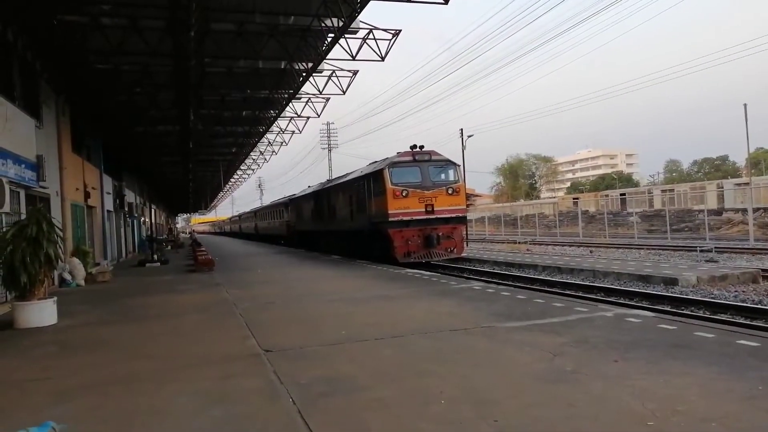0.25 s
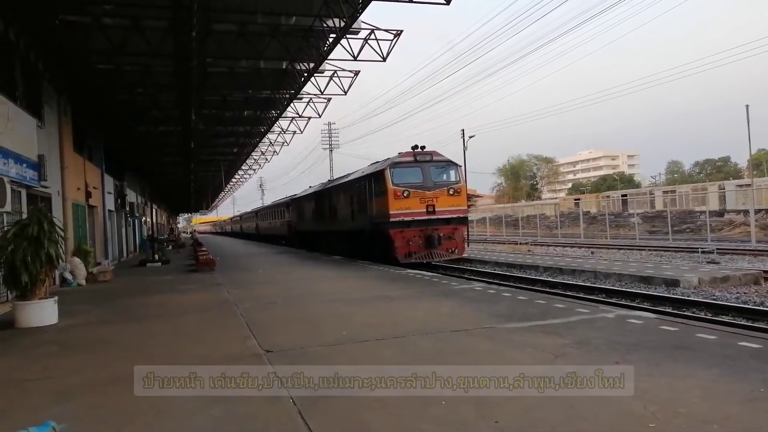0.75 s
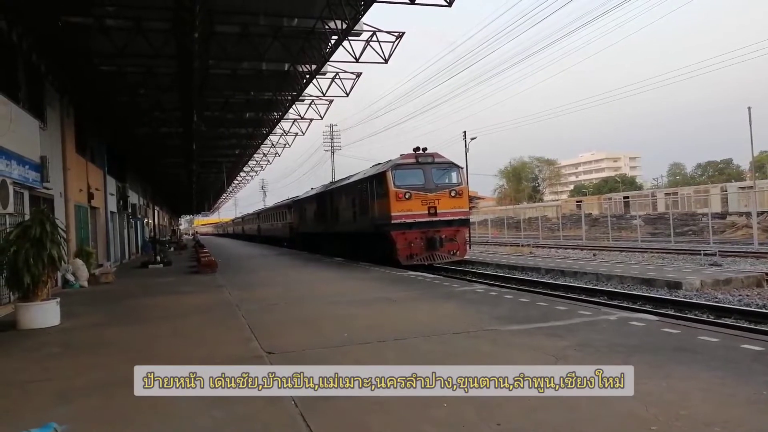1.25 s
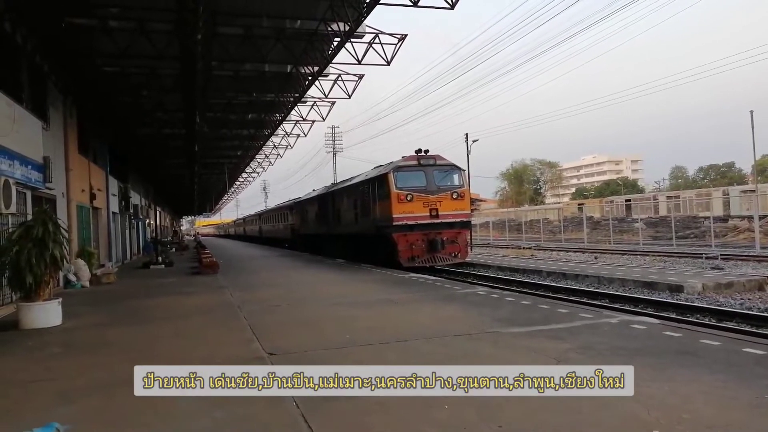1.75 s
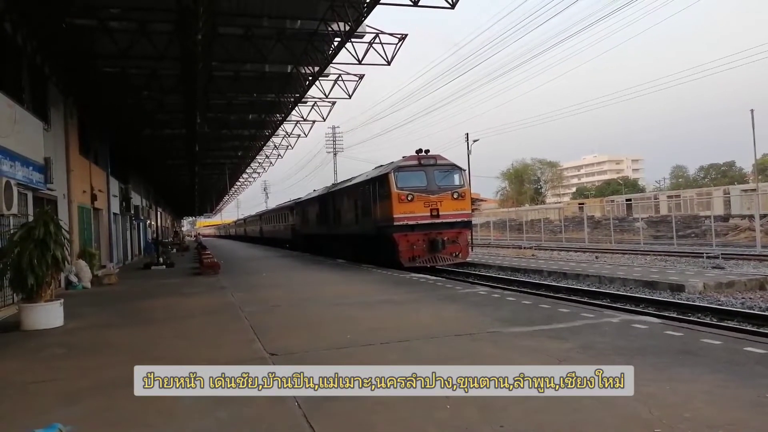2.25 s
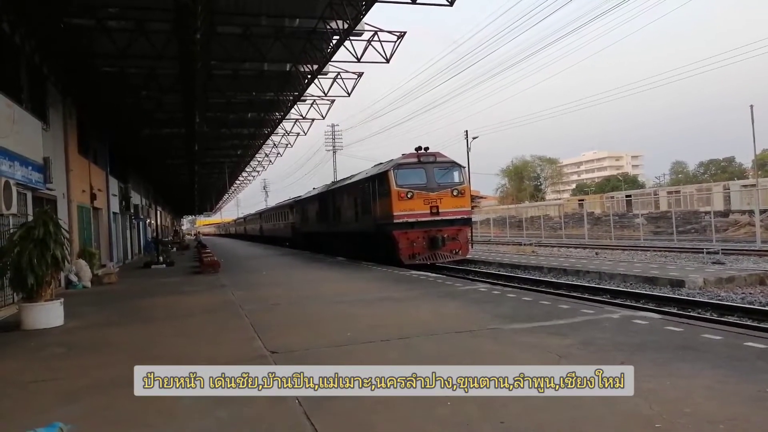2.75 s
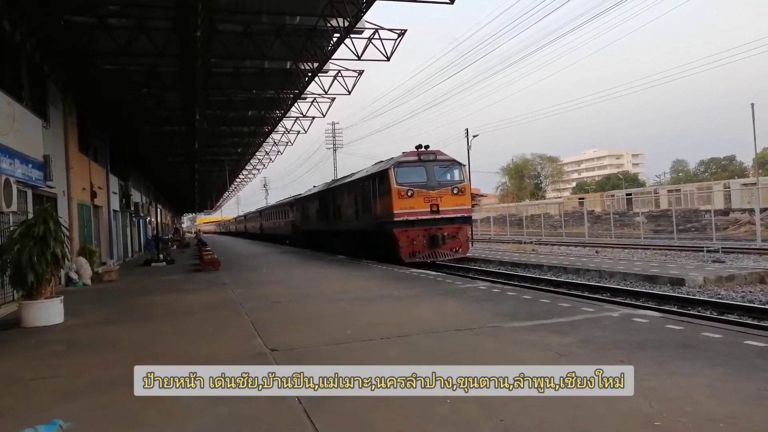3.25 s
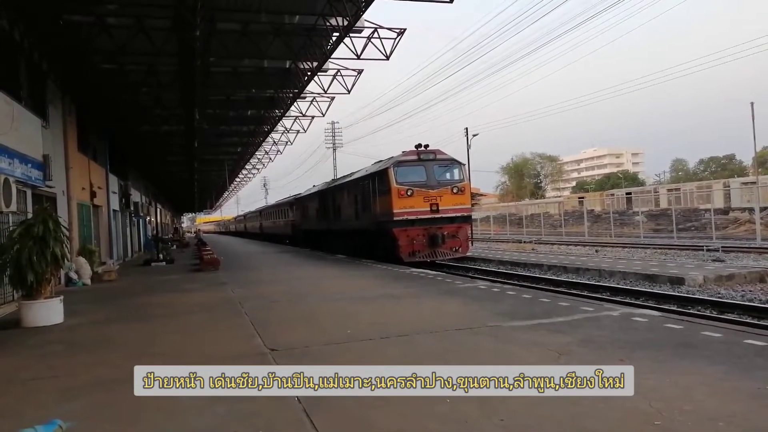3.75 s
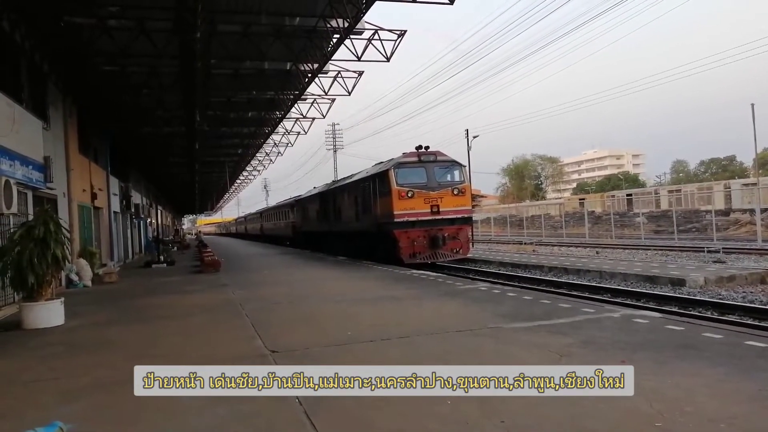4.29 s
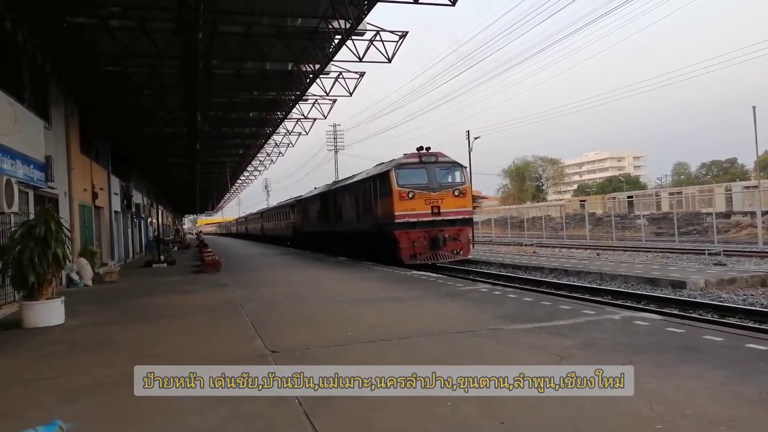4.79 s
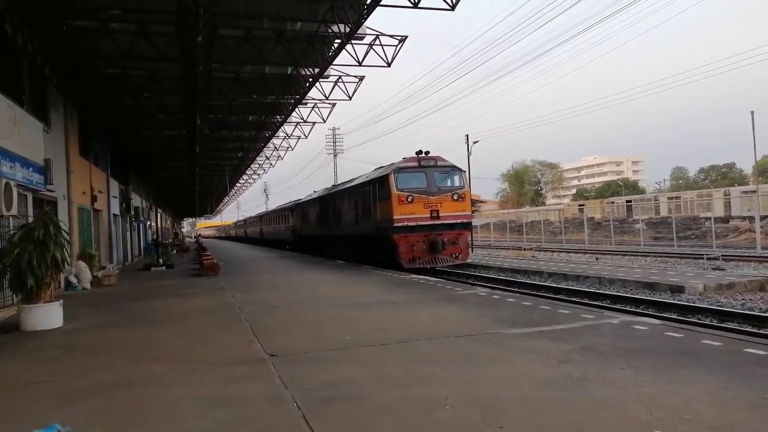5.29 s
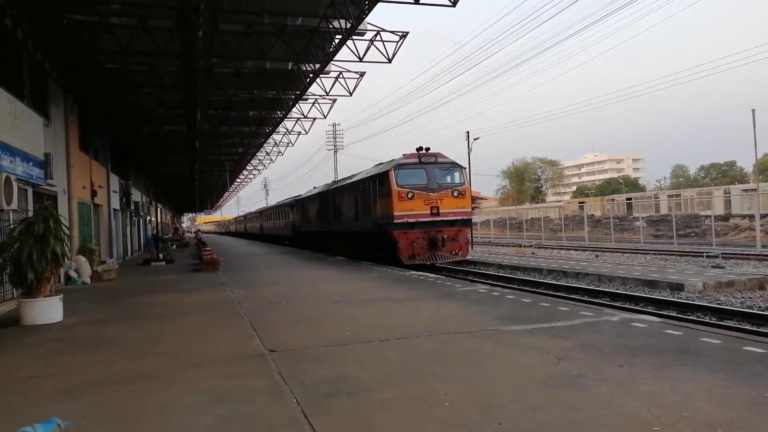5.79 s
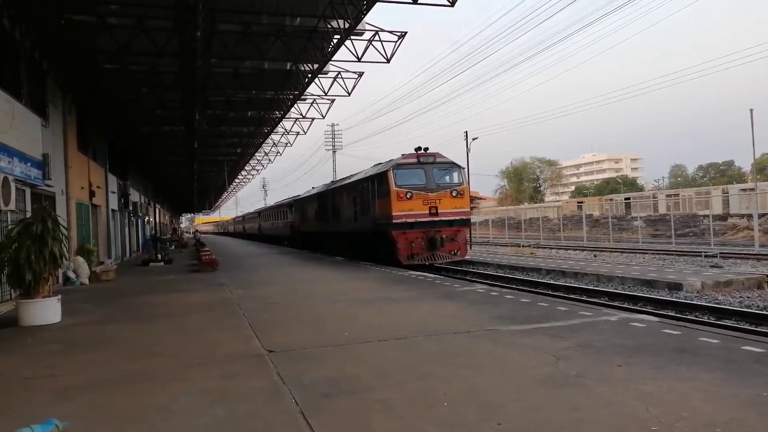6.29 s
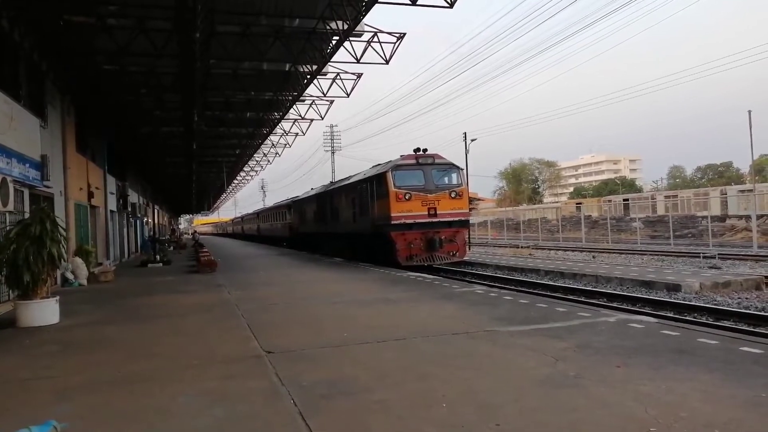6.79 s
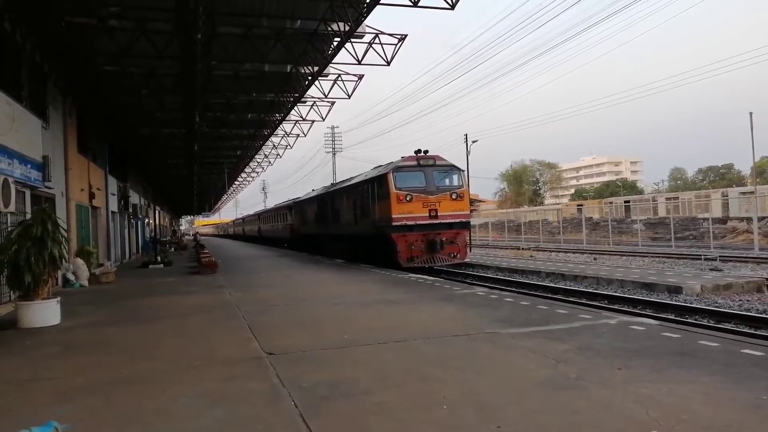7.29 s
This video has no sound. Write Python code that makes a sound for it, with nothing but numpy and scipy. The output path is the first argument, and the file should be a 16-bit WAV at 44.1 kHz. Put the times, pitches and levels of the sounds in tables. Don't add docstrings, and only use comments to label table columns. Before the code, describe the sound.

A blaring train horn wavers twice and cuts off with an echo, then a diesel locomotive idles, hisses air and revs up with a whine.

```python
import sys
import numpy as np
from scipy import signal
from scipy.fft import rfft, irfft, next_fast_len
from scipy.io import wavfile
from scipy.ndimage import uniform_filter1d, minimum_filter1d, map_coordinates

SR = 44100
rng = np.random.default_rng(int(sys.argv[2]) if len(sys.argv) > 2 else 0)


def amplitude_ratio(level_db):
    exponent = np.asarray(level_db, float) / 20
    return 10 ** exponent


def pcm_store(signal):
    levels = np.round(np.clip(np.atleast_2d(signal), -1, 1) * 32767)
    wavfile.write(sys.argv[1], SR, levels.astype(np.int16).T)


N = 332514

# delay_s, level_db, dull_above_hz
ECHOES = [(.017, -37, 12300), (.033, -34, 3770), (.056, -18, 8800), (.1005, -5, 1360), (.19, -24, 2500),
          (.42, -27, 2930), (.6, -37, 2480), (.85, -62, 1250), (1.45, -43.5, 800)]
# delay_s, level_db
GLINTS = [(.0019, -14), (.0037, 4.5), (.0071, -4)]
# band_hz, t60_s, level_db
STATION_T60 = [(367, 2.83, -1), (800, 2.53, -2), (1640, 1.2, 6.5), (3400, 0.8, 11.5), (6000, 0.88, 11.5)]
GLINT_ABOVE_HZ = 10800

EXHAUST_IDLE_DB = [-47.7, -51.3, -55.3, -40.2, -51.7, -47.9, -39.9, -36.2, -34.1, -38.8, -42.9, -26.3,
                   -36.9, -36.3, -42.2, -37.8, -34.7, -47.1, -43.4, -38.5, -37.8, -46.7, -40.1, -37.6,
                   -46.5, -45.6, -50.5, -35.8, -48.2, -44.8, -53.1, -46.7, -45.0, -50.1, -45.1, -43.9,
                   -49.7, -46.1, -46.3, -50.3, -51.1, -51.9, -49.4, -43.5]
# multiple, added_db
EXHAUST_LOADED = [(5, 11), (11, 10), (14, 7), (16, 7.5), (19, 3), (22, 9), (30, -2), (48, 7)]
# time_s, load_0_to_1
LOAD = [
    (1.6, .3),
    (5.2, 0.13),
    (6.3, 0.27),
    (6.45, .7),
    (6.65, 0.26),
    (6.92, 1.1),
    (7.1, 0.9),
    (7.54, 0.8),
]
# freq_hz, density_db
RUMBLE = [(22, -11.5), (45, -13.5), (80, 3), (130, -4), (250, -5), (400, -5), (520, -28), (800, -10)]
# freq_hz, density_db
CLATTER = [(350, -4.5), (520, -4.5), (800, -0.5), (1300, -5), (1900, 0.5), (2500, -3.5), (3000, -13.5),
           (4400, -16.5), (5300, -23.5), (9000, -26.5), (10200, -36), (14800, -55)]
# freq_hz, rms_db
FAN_LINES = [(405.8, -49.5), (709, -46.5), (988, -61), (1366, -50.5), (1703, -47.5)]
IDLE_CYCLES_PER_S, REV_FROM_S, REV_CYCLES_PER_S2 = 5.875, 6.45, .61
FIRINGS_PER_CYCLE, CYCLE_START_RAD, PIPE_SMEAR_RAD = 16, 2.2, 1.6
RUMBLE_DB, RUMBLE_LOAD_DB, CLATTER_DB, CLATTER_LOAD_DB = -28, 1.5, -29.5, 3.5
COARSE_SAMPLES = 12

# start_s, attack_s, hold_s, release_db_per_s, level_db
BURSTS = [
    (2.097, .03, .04, 98, -29.5),
    (5.922, 0.0068, .03, 68, -33.5),
]
# freq_hz, density_db
BURST_COLOUR = [(1760, -38), (3000, -1), (4190, 4.5), (4540, 0.5), (5890, -9.5), (6960, 1.5), (8330, 2),
                (11100, -12.5), (12900, -16), (14800, -36)]
# start_s, attack_s, hold_s, release_db_per_s, level_db
LEAKS = [
    (5.12, 0.22, .55, 10, -42),
    (6.4, .03, .02, 74, -53),
    (6.8, 0.043, .06, 70, -50),
]
# freq_hz, density_db
LEAK_COLOUR = [(2500, -24), (3500, -2), (5000, -2.5), (7500, -2.5), (9500, -5.5), (11000, -19.5),
               (14800, -32)]
# start_s, end_s, freq_hz, width_hz, level_db
WHISTLES = [
    (2.12, 2.3, 4530, 50, -46),
    (2.115, 2.2, 3600, 300, -46),
    (5.22, 5.58, 8000, 40, -51),
    (5.4, 5.9, 5570, 40, -58),
    (5.25, 5.6, 12000, 3000, -59),
    (5.0, 7.1, 1130, 90, -42),
    (5.925, 5.96, 3450, 250, -37),
    (5.926, 5.95, 11300, 800, -48),
    (5.3, 5.55, 9500, 200, -54),
    (5.92, 6.1, 9800, 3000, -49),
]

WHINE_FROM_S, WHINE_SETTLE_S, WHINE_START_HZ, WHINE_END_HZ = 6.94, 0.23, 7600, 7080
WHINE_DB, WHINE_RISE_DB = -32.5, 22

# time_s, pitch_hz, level_db
HORN = [
    (0, 620.2, 20),
    (.505, 619.8, 24.5),
    (.635, 596.5, 17.5),
    (.7, 615, 18),
    (.87, 621.2, 21.5),
    (1.05, 588, 16),
    (1.112, 586, 8.5),
    (1.125, 566, 9.5),
    (1.16, 555, 9.5),
]
HORN_ORDERS_DB = [-11.9, -26.8, -14.1, -14.8, -27.1, -23.7, -14.4, -30.2, -40.2, -44.1, -38, -39, -49, -46,
                  -45.0, -50.8, -53, -61, -62.4, -60, -75, -72, -61.0, -70, -70]
# multiple, change_db per tenth of pitch sag
SAG = [(1, -14.5), (2, 17.5), (3, 0), (5, 10.5), (7, -27.5), (10, -8), (18, 3), (25, 18)]
# freq_hz, density_db
HORN_AIR = [(400, -7), (900, -9), (2000, 1.5), (4000, -6.5), (7500, -7), (9500, -18), (11000, -19),
            (14500, -33)]
HORN_STOP_S, HORN_RELEASE_DB_PER_S = 1.1485, 1295
RUN_IN_SAMPLES = SR
SPREAD_RAD = .49

# freq_hz, level_db
RECORDER_LINE = (12896, -84)
# depth_db under the whole sound, spread_db
MUTE = (-69, 5)
DUCK_DB, RECOVER_FROM_S, RECOVER_S = -20, 1.08, 0.21
CEILING = .94


def in_time(rows, lead=0):
    s, *columns = np.transpose(rows)
    return [np.interp(np.arange(-lead, N) / SR, s, c) for c in columns]


def rms_one(x):
    return x / np.sqrt(np.mean(x ** 2) + 1e-20)


def drift(rate, size=N):
    r = np.exp(-80 * np.pi * rate / SR)
    slow = signal.lfilter([1], [1, -2 * r, r * r], rng.standard_normal(size // 40 + 2002))[2000:]
    return np.interp(np.arange(size) / 40, np.arange(len(slow)), rms_one(slow))


def wander(rate, count):
    knots = rng.standard_normal((count, int(8 * 6) + 4))
    at = np.arange(N // COARSE_SAMPLES + 1) * COARSE_SAMPLES / SR * np.clip(rate, .1, 6)
    return [map_coordinates(row, [at], order=3) for row in knots]


def coloured(spectrum, size=N):
    pad = next_fast_len(size)
    hz, db = np.transpose(spectrum)
    grid_hz = np.fft.rfftfreq(pad, 1 / SR) + 1
    shape = amplitude_ratio(np.interp(np.log(grid_hz), np.log(hz), db, left=-90, right=-90))
    return rms_one(irfft(rfft(rng.standard_normal(pad)) * shape, pad)[:size])


def narrow_noise(hz, width_hz):
    phase = 2 * np.pi * np.cumsum(hz + np.zeros(N)) / SR
    low_pass = signal.butter(2, width_hz / 2, fs=SR, output="sos")
    a, b = signal.sosfilt(low_pass, rng.standard_normal((2, N)))
    return rms_one(a * np.cos(phase) + b * np.sin(phase))


def puffs(rows):
    t = np.arange(N) / SR
    total = np.zeros(N)
    for start, attack, hold, fall_db, db in rows:
        release_db = fall_db * np.maximum(t - start - attack - hold, 0)
        total += amplitude_ratio(db - release_db) * np.clip((t - start) / attack, 0, 1) ** 2
    return total


def station(wet_db):
    pad = SR * 5
    t, grid_hz = np.arange(SR * 2) / SR, np.fft.rfftfreq(pad, 1 / SR)
    white, tail = rng.standard_normal(len(t)), 0
    for hz, t60, db in STATION_T60:
        octave = signal.butter(2, [hz / np.sqrt(2), hz * np.sqrt(2)], "band", fs=SR, output="sos")
        tail = tail + signal.sosfilt(octave, white) * amplitude_ratio(db - 60 * t / t60) * np.clip(t / 0.011, 0, 1)
    paths = 1 + amplitude_ratio(wet_db) * rfft(tail, pad)
    for delay, db, cut_hz in ECHOES:
        paths += amplitude_ratio(db) * np.exp(-2j * np.pi * grid_hz * delay) / (1 + 1j * grid_hz / cut_hz) ** 2
    for delay, db in GLINTS:
        treble = 1 / (1 - 1j * GLINT_ABOVE_HZ / (grid_hz + 1)) ** 2
        paths += amplitude_ratio(db) * np.exp(-2j * np.pi * grid_hz * delay) * treble
    return grid_hz, paths, pad


def shadowed(x):
    pad = next_fast_len(N + 4096)
    f = np.fft.rfftfreq(pad, 1 / SR)
    late = .739 * np.exp(-2j * np.pi * f * 23.3 / SR) / (1 + 1j * f / 392)
    bass = .409 * np.exp(2j * np.pi * f * 9.5 / SR) / (1 + 1j * f / 321 - (f / 302) ** 2)
    bass -= .268 / (1 + 1j * f / 30.6)
    return irfft(rfft(x, pad) * (late + bass), pad)[:N]


def exhaust(phase, load):
    coarse = np.minimum(np.arange(N // COARSE_SAMPLES + 1) * COARSE_SAMPLES, N - 1)
    slow_curves = wander(3.5, count=len(EXHAUST_IDLE_DB))
    tones = np.zeros(len(coarse))
    for k, (db, slow) in enumerate(zip(EXHAUST_IDLE_DB, slow_curves), 5):
        loaded_db = np.interp(k, *np.transpose(EXHAUST_LOADED)) * load[coarse]
        size = np.sqrt(2) * amplitude_ratio(db - 1.6 + loaded_db + 1.6 * slow)
        scatter = PIPE_SMEAR_RAD * rng.standard_normal()
        tones -= size * np.cos(k * (phase[coarse] + CYCLE_START_RAD) + scatter)
    return signal.resample_poly(tones, COARSE_SAMPLES, 1)[:N]


def fans():
    t = np.arange(N) / SR
    lines = sum(np.sqrt(2) * amplitude_ratio(db) * np.sin(2 * np.pi * hz * t) for hz, db in FAN_LINES)
    return amplitude_ratio(2.1 * drift(3.0)) * lines


def engine():
    cycle_hz = IDLE_CYCLES_PER_S + REV_CYCLES_PER_S2 * np.maximum(np.arange(N) / SR - REV_FROM_S, 0)
    load, = in_time(LOAD)
    phase = 2 * np.pi * np.cumsum(cycle_hz * (1 + 0.001 * drift(1.67))) / SR
    knock = 1 + .05 * np.cos(2 * phase) + 0.054 * np.cos(FIRINGS_PER_CYCLE * phase)
    rumble = amplitude_ratio(RUMBLE_DB + RUMBLE_LOAD_DB * load + 0.41 * drift(3.7)) * coloured(RUMBLE)
    clatter_level = amplitude_ratio(CLATTER_DB + CLATTER_LOAD_DB * load + 0.55 * drift(2.6)) * knock
    near = exhaust(phase, load) + rumble + fans() + clatter_level * coloured(CLATTER)
    return near, clatter_level * coloured(CLATTER)


def valves():
    t = np.arange(N) / SR
    out = puffs(BURSTS) * coloured(BURST_COLOUR) + puffs(LEAKS) * coloured(LEAK_COLOUR)
    for start, end, hz, width_hz, db in WHISTLES:
        swell = np.sin(np.pi * np.clip((t - start) / (end - start), 0, 1))
        out += amplitude_ratio(db) * swell * narrow_noise(hz, width_hz)
    return out


def turbocharger():
    age_s = np.arange(N) / SR - WHINE_FROM_S
    unsettled = np.exp(-np.maximum(age_s, 0) / WHINE_SETTLE_S)
    hz = WHINE_END_HZ + (WHINE_START_HZ - WHINE_END_HZ) * unsettled
    level = amplitude_ratio(WHINE_DB - WHINE_RISE_DB * unsettled) * np.clip(1 + age_s / 0.095, 0, 1)
    return level * narrow_noise(hz, width_hz=390)


def horn():
    grid_hz, paths, pad = station(wet_db=-49.0)
    hz, level_db = (c[:int(RUN_IN_SAMPLES * 2.25)] for c in in_time(HORN, lead=RUN_IN_SAMPLES))
    t = (np.arange(len(hz)) - RUN_IN_SAMPLES) / SR
    level_db = level_db - HORN_RELEASE_DB_PER_S * np.clip(t - HORN_STOP_S, 0, .08)
    phase = 2 * np.pi * np.cumsum(hz * (1 + .0001 * drift(28, size=len(hz)))) / SR
    sag = 10 * (1 - hz / hz[0])
    choke_db = 35.0 * np.clip(sag - .63, 0, 1)
    tone = amplitude_ratio(-47) * np.cos(3 * phase / 2)
    for k, db in enumerate(HORN_ORDERS_DB, 1):
        steady = paths[np.searchsorted(grid_hz, k * hz[0])]
        sag_db = sag * np.interp(k, *np.transpose(SAG))
        size = np.sqrt(2) * amplitude_ratio(db + sag_db - choke_db * max(k - 3, 0)) / np.clip(abs(steady), .4, 2.5)
        tone += size * np.cos(k * phase - SPREAD_RAD * k * k - np.angle(steady))
    air = amplitude_ratio(-33.5 - 3.3 * sag) * coloured(HORN_AIR, size=len(hz)) * (1 + 0.52 * np.cos(phase))
    blast = amplitude_ratio(level_db - 0.64) * (tone + air)
    out = irfft(rfft(blast, pad) * paths, pad)[RUN_IN_SAMPLES:]
    return np.pad(out, (0, N - len(out)))


def scene():
    motor, other = engine()
    blast = horn()
    near = blast + motor + valves() + turbocharger()
    second = signal.lfilter(*signal.iirpeak(1220, 6.0, fs=SR), blast)
    bright = signal.sosfilt(signal.butter(2, 2800, "high", fs=SR, output="sos"), other)
    far = shadowed(near + amplitude_ratio(10.0) * second + amplitude_ratio(-5.5) * other + amplitude_ratio(-5.5) * bright)
    return np.array([near, far])


def gate(x, depth_db, spread_db):
    window = np.sin(np.pi * (np.arange(2048) + .5) / 2048)
    bins = signal.stft(x, window=window, nperseg=2048)[2]
    power = uniform_filter1d(abs(bins[:, :1024]) ** 2, size=3, axis=1)
    chance = rng.standard_normal((2, 32, power.shape[2]))
    chance = uniform_filter1d(chance, size=3, axis=2) * np.sqrt(3)
    side_db = np.array([[[0]], [[4]]])
    limit_db = depth_db - side_db + spread_db * np.repeat(chance, 32, axis=1)
    limit = power.sum(axis=1, keepdims=True) * amplitude_ratio(2 * limit_db)
    bins[:, :1024] *= np.where(power > limit, 1, amplitude_ratio(-40))
    return signal.istft(bins, window=window, nperseg=2048)[1][:, :N]


def roll_off(x):
    return signal.sosfilt(signal.butter(12, 15030, fs=SR, output="sos"), x)


def record(dry):
    t = np.arange(N) / SR
    hz, db = RECORDER_LINE
    line = amplitude_ratio(db + 5.0 * drift(12)) * np.sin(2 * np.pi * hz * t)
    gain = amplitude_ratio(DUCK_DB * np.exp(-np.maximum(t - RECOVER_FROM_S, 0) / RECOVER_S))
    peak = abs(dry * gain).max(axis=0) + 1e-9
    room_left = minimum_filter1d(np.minimum(1, CEILING / peak), size=2205)
    gain = gain * uniform_filter1d(room_left, size=1103)
    mix = gate(dry * gain, *MUTE) + line * gain
    return roll_off(mix)


dry = scene()
out = record(dry)
pcm_store(out)
```